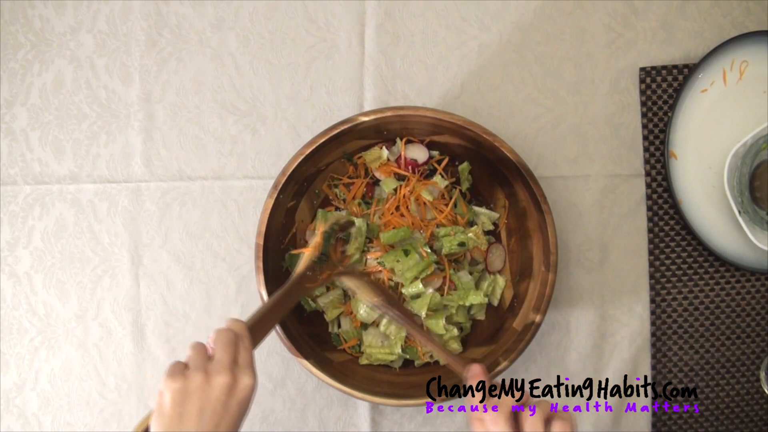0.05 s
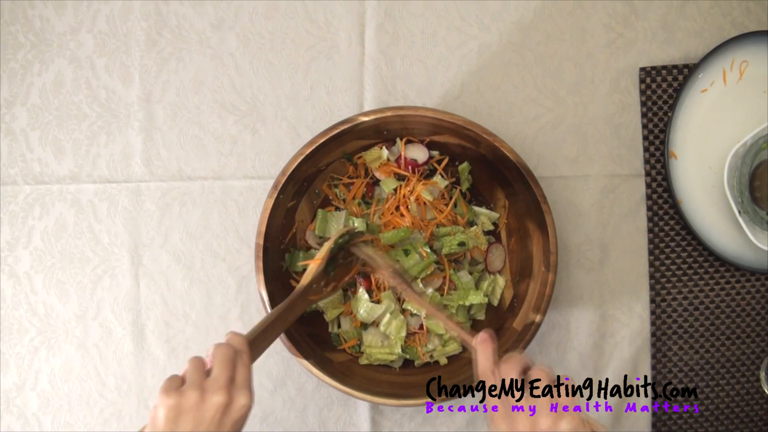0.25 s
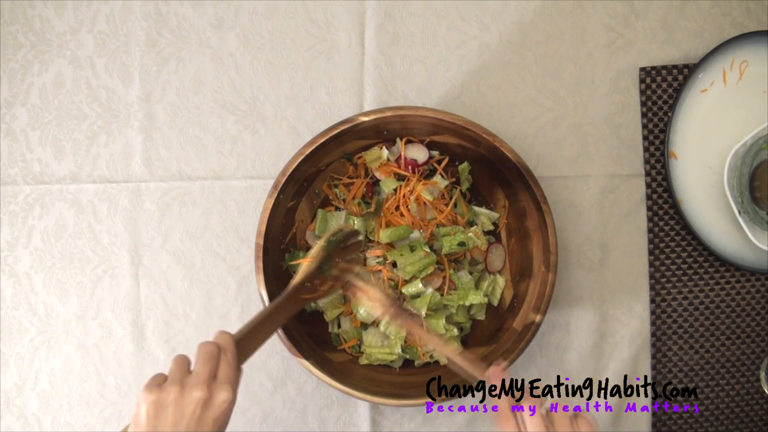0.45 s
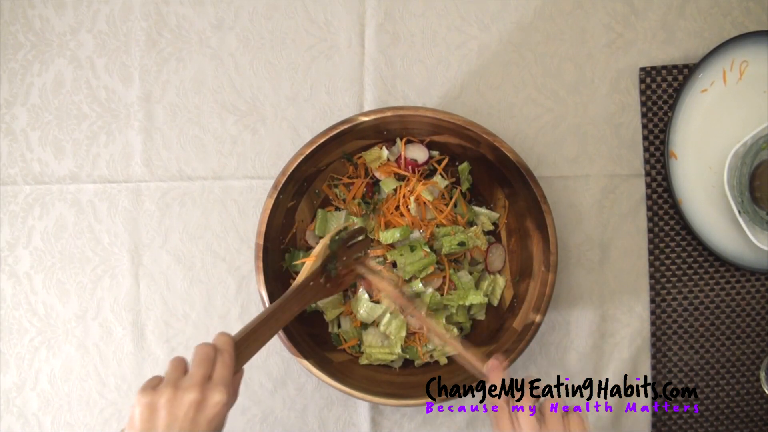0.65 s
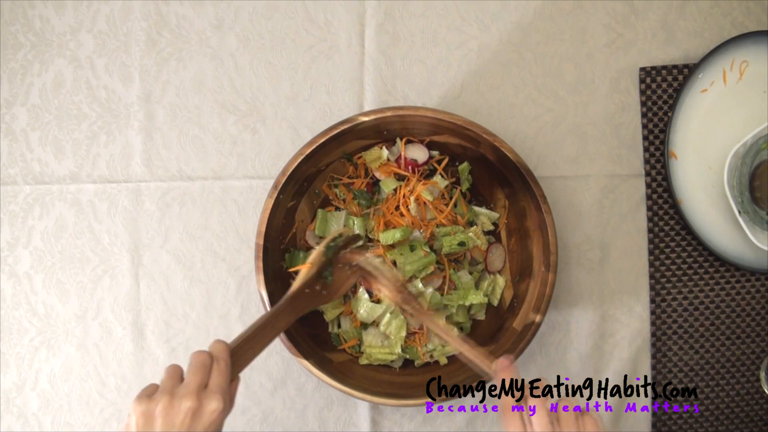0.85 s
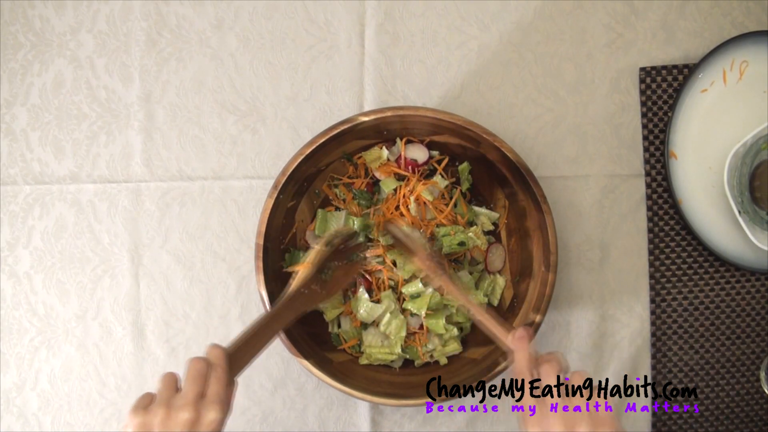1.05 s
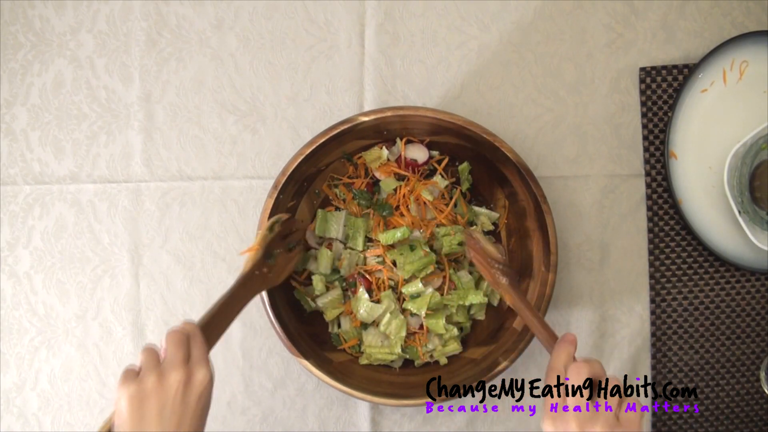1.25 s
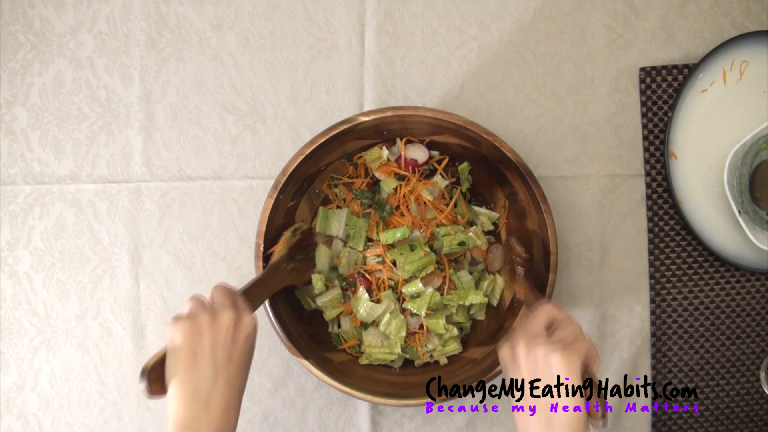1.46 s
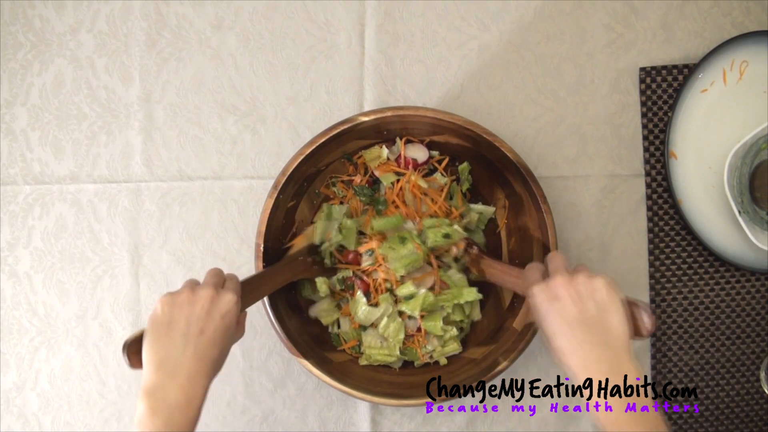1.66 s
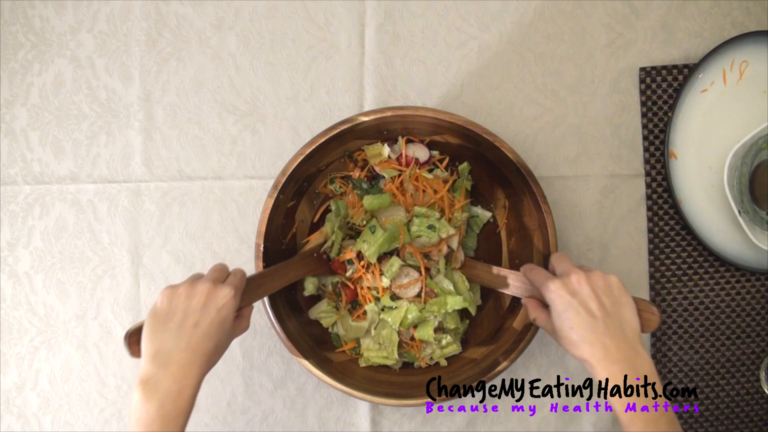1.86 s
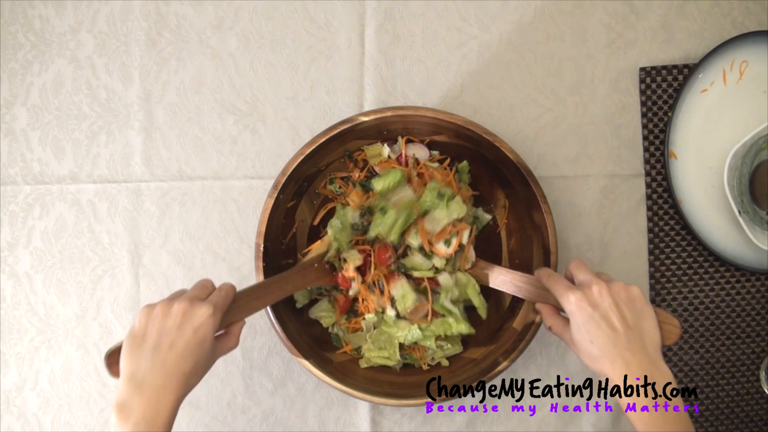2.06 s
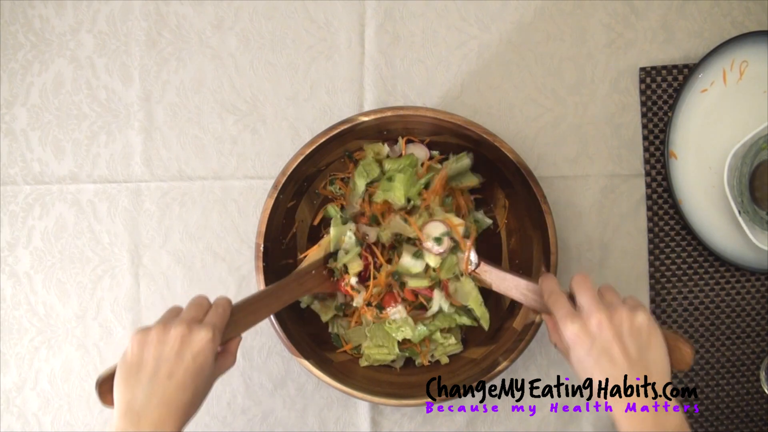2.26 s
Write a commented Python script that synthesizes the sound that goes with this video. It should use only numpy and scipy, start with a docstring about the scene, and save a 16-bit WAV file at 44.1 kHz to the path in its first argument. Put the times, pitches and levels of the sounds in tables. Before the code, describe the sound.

Wooden servers clack together and knock a wooden bowl as leafy salad is tossed.

```python
"""A sharp wooden clack comes first: two servers meet while tossing a leafy salad in a wooden bowl.
They clack again, then one knocks the bowl, which rings hollow, and scrapes down its wall.
The leaves crinkle and snap as they are lifted, and the bowl bumps softly on the table.
Each sound echoes briefly in a quiet kitchen, over a faint rumble and hiss."""
import sys
import numpy as np
from scipy import signal
from scipy.fft import rfft, irfft, next_fast_len
from scipy.io import wavfile
from scipy.ndimage import uniform_filter1d, minimum_filter1d, map_coordinates

SR = 44100
rng = np.random.default_rng(int(sys.argv[2]) if len(sys.argv) > 2 else 0)


def master(y):
    """Save y as 16-bit WAV."""
    cut = np.clip(np.atleast_2d(y).T, -1, 1)
    pcm = np.round(cut * 32767)  # scale
    wavfile.write(sys.argv[1], SR, pcm.astype(np.int16))


N = 101429


def amp(db):
    """Turn decibels into a number to multiply by."""
    return 10 ** (np.asarray(db) / 20)


def unit(x):
    """Scale a sound to an average (rms) strength of 1."""
    return x / np.sqrt(np.mean(x ** 2) + 1e-20)


def along(points, hz):
    """Read between (frequency, value) points on a log frequency scale."""
    freqs, values = np.transpose(points)
    return np.interp(np.log(hz + 1), np.log(freqs + 1), values)


def level(points):
    """A volume curve through (time [s], level [dB]) points."""
    return amp(np.interp(np.arange(N) / SR, *np.transpose(points)))


def filtered(x, response):
    """Turn each frequency up or down by response(hz)."""
    size = next_fast_len(N + SR // 2)
    return irfft(rfft(x, size) * response(np.fft.rfftfreq(size, 1 / SR)), size)[..., :N]


def coloured(x, colour):
    """Give a sound a tone colour (its mix of low and high), at strength 1."""
    return unit(filtered(x, lambda hz: amp(along(colour, hz))))


def delayed(x, s):
    """Start a sound s seconds later."""
    return np.pad(x, (max(round(s * SR), 0), 0))[:N]


def fade(fade_s):
    """Die away by 60 dB in fade_s seconds, the 'fade time'."""
    return np.exp(-np.log(1000) * np.arange(N) / SR / fade_s)


def pan(db):
    """Left and right volumes that average 1; positive dB leans left."""
    left = np.atleast_1d(amp(db))
    return 2 * np.array([left, np.ones_like(left)]) / (1 + left)


def widen(mid, side, side_db):
    """Make stereo: both ears share mid and get side with opposite signs."""
    return np.array([mid + amp(side_db) * side, mid - amp(side_db) * side])


def ring(tones, attack_s, pitch=1):
    """One blow sets all of an object's tones ringing; each fades at its own pace."""
    t = np.arange(N) / SR
    tone = sum(amp(db) * fade(fade_s) * np.sin(2 * np.pi * hz * pitch * t) for hz, db, fade_s in tones)
    return tone * (1 - np.exp(-(t / attack_s) ** 2))


def crack(colour, fade_s, attack_s):
    """The noise of a hit: one clean push and a burst of rough chatter."""
    size, push_db, chatter_db = 8192, -2.5, -0.5
    t = np.arange(size) / SR
    # build a colour filter that makes no sound before the hit (minimum phase)
    gains = unit(amp(along(colour, np.fft.rfftfreq(size, 1 / SR))))
    cepstrum = irfft(np.log(gains))
    cepstrum[1:size // 2] *= 2
    cepstrum[size // 2 + 1:] = 0
    chatter = rng.standard_normal(size) * fade(fade_s)[:size] * (1 - np.exp(-t / attack_s))
    push = np.linalg.norm(chatter) * (np.arange(size) == round(attack_s * SR))
    burst = amp(push_db) * push + amp(chatter_db) * chatter
    return np.pad(irfft(rfft(burst) * np.exp(rfft(cepstrum))), (0, N - size))


def grains(per_s, spread_db):
    """Tiny clicks of uneven size at random moments."""
    clicks = (rng.random(N) < per_s / SR) * np.sign(rng.standard_normal(N))
    return clicks * amp(spread_db * np.clip(rng.standard_normal(N), -2, 2))


# tone colour of the quiet room (frequency [Hz], level [dB])
ROOM_TONE_COLOUR = [(12, -29), (20, 5.5), (107, -3), (138, -4), (168, -4.5), (228, 0.5), (319, -1.5),
                    (399, -2.5), (923, 0), (1480, -2.5), (1910, -4), (2320, -7), (16000, -23)]
# which way it leans (frequency [Hz], left minus right [dB])
ROOM_TONE_BALANCE = [(60, -12), (110, -19), (200, -7.5), (380, 1), (1000, 2), (5000, 2.5), (9000, 0),
                     (15000, -23)]
def room_tone():
    """The room's steady, faint rumble and hiss."""
    mid = coloured(rng.standard_normal(N), ROOM_TONE_COLOUR)
    side = coloured(rng.standard_normal(N), ROOM_TONE_COLOUR)
    stereo = widen(mid, side, side_db=-2.5)
    return amp(-56) * filtered(stereo, lambda hz: pan(along(ROOM_TONE_BALANCE, hz)))


# how long the room's echo lasts (frequency [Hz], fade time [s])
ECHO_FADE = [(150, 0.44), (500, 0.61), (1400, 0.57), (2600, 0.53), (4500, 0.6), (9000, 0.6), (15000, 0.15)]
# tone colour of that echo (frequency [Hz], level [dB])
ECHO_COLOUR = [(100, 1.5), (500, 2.5), (1400, -0.5), (3000, -2), (6000, 1.5), (11000, 2), (16000, -2)]
def echo_tail():
    """Countless reflections blur into noise that swells quickly and dies away."""
    onset_s, build_s, smooth_hz = 0.0053, 0.0029, 120
    bands, times, spectra = signal.stft(rng.standard_normal((2, SR)), SR, nperseg=256)
    decay = np.exp(-np.log(1000) * times / along(ECHO_FADE, bands)[:, None])
    tail = signal.istft(spectra * decay, SR, nperseg=256)[1]
    size = tail.shape[1]
    tail *= 1 - np.exp(-np.maximum(np.arange(size) / SR - onset_s, 0) / build_s)
    # even out chance peaks, then add the room's colour
    spectrum, hz = rfft(tail), np.fft.rfftfreq(size, 1 / SR)
    power = np.abs(uniform_filter1d(np.abs(spectrum) ** 2, round(smooth_hz / hz[1])))
    tail = irfft(spectrum * amp(along(ECHO_COLOUR, hz)) / np.sqrt(power), size)
    return widen(*tail[:, :SR * 3 // 4], side_db=-0.5)


# bounces off the two nearest surfaces (delay [s], level [dB])
WALL_BOUNCES = [(.0047, -18.5), (0.0108, -14)]
def kitchen(x, echo_db):
    """A sound arrives directly, then off nearby surfaces and as a blurred stereo echo."""
    echo = signal.fftconvolve(x[None], echo_tail(), axes=1)[:, :N]
    bounces = sum(amp(db) * delayed(x, s) for s, db in WALL_BOUNCES)
    return x + pan(db=-1) * (amp(echo_db) * echo + bounces)


# the bowl meets the table (time [s], level [dB])
BUMP_HITS = [(2.191, -42), (2.254, -37.5), (2.28, -51)]
# low tones of each bump (frequency [Hz], level [dB], fade time [s])
BUMP_TONES = [(80, -20, 0.17), (193, -2, 0.052), (269, 6, 0.045), (464, 9, 0.02), (654, -11, 0.062)]
def bowl_bumps():
    """The bowl thuds softly on the table as the salad is lifted."""
    thud = ring(BUMP_TONES, attack_s=0.0017)
    return kitchen(sum(amp(db) * delayed(thud, s) for s, db in BUMP_HITS), echo_db=-4)


# loudness of the shifting leaves (time [s], level [dB])
RUSTLE_LEVEL = [(0, -70), (.72, -65), (.755, -50.5), (.78, -49.5), (.81, -70), (.95, -84), (1.22, -82),
                (1.28, -57), (1.36, -59.5), (1.5, -51), (1.67, -46.5), (1.85, -42.5), (1.95, -96),
                (2.11, -53), (2.22, -59.5), (2.3, -56)]
# tone colour of the rustle (frequency [Hz], level [dB])
RUSTLE_COLOUR = [(300, 0), (1500, 1), (2700, 1), (3700, 2.5), (5500, -3), (8000, -5.5), (11500, -4.5),
                 (14000, -17), (16000, -15.5)]
# crisp leaves snapping (time [s], level [dB], centre frequency [Hz], width [octaves])
LEAF_SNAPS = [(1.5465, -47, 8000, 0.46), (1.5642, -46, 10100, .4), (1.669, -38, 10500, 0.25),
              (1.676, -34.5, 9800, 0.28), (2.0715, -39, 4670, 0.77), (2.2, -43, 10400, 0.13),
              (2.2825, -42.5, 12000, 0.21), (2.288, -48, 11500, .25)]
def leaves():
    """Moving lettuce makes a fine crinkle of tiny clicks, with a few crisp snaps."""
    out = coloured(grains(per_s=2500, spread_db=5.5), RUSTLE_COLOUR) * level(RUSTLE_LEVEL)
    for s, db, centre_hz, octaves in LEAF_SNAPS:
        band = lambda hz: 1 / (1 + (np.log2((hz + 1) / centre_hz) / octaves) ** 2)
        snap = unit(filtered(rng.standard_normal(N), band)) * fade(fade_s=0.0093)
        out = out + amp(db) * delayed(snap, s)
    return pan(db=2.5) * kitchen(out, echo_db=-7)


# loudness of the server sliding down the bowl (time [s], level [dB])
SCRAPE_LEVEL = [(1.6, -62), (1.69, -44), (1.7, -35), (1.745, -35), (1.795, -38.5), (1.825, -36),
                (1.862, -34), (1.895, -45), (1.925, -65), (1.97, -62)]
# tones of server and bowl pressed together (frequency [Hz], width [Hz], level [dB])
SCRAPE_TONES = [(282, 43, 0), (562, 143, 1.5), (1423, 123, 4.5), (1930, 79, 7), (2785, 390, 1.5),
                (3640, 140, 0.5), (3904, 170, -0.5), (5830, 490, -34), (7700, 2400, -17),
                (12300, 2100, -10)]
def server_scrape():
    """Wood catches and slips on wood; the many tiny jolts make server and bowl rasp."""
    judder_per_s, judder_db, top_hz = 120, 1.2, 11570
    judder = map_coordinates(rng.standard_normal(2048), [np.arange(N) * judder_per_s / SR])
    slips = grains(per_s=3000, spread_db=2.5) * amp(judder_db * judder)
    wood = lambda hz: sum(amp(db) * 1j * hz * width / (centre ** 2 - hz ** 2 + 1j * hz * width)
                          for centre, width, db in SCRAPE_TONES)
    rasp = filtered(slips, lambda hz: wood(hz) / (1 + (hz / top_hz) ** 10))
    started = np.arange(N) > SCRAPE_LEVEL[0][0] * SR
    return kitchen(unit(rasp) * level(SCRAPE_LEVEL) * started, echo_db=-9)


# a server hits the bowl (time [s], level [dB], crack within the hit [dB])
KNOCK_HITS = [(1.376, -17, 6.5), (1.3838, -15.5, 0.5), (1.4859, -37.5, 11.5)]
# tones the bowl rings with (frequency [Hz], level [dB], fade time [s])
BOWL_TONES = [(203.3, -27.5, 0.33), (275, -36.5, 0.56), (295.2, -23.5, 0.2), (317, -22, 0.42),
              (539.5, -30.5, 0.28), (730.7, -12, .3), (756, -14.5, 0.34), (877, -6.5, 0.054),
              (1321, -14, 0.087), (1407.6, 0, 0.094), (1449, -7, 0.087), (1980, -24, 0.26),
              (2083, -3, 0.099), (2440, -14, 0.018), (3027, 4, 0.022)]
# tone colour of the knock's crack (frequency [Hz], level [dB])
KNOCK_COLOUR = [(50, -18.5), (130, -17), (280, -3), (1000, -2.5), (2800, 3.5), (4500, -8), (7000, -17),
                (9500, -29.5), (11500, -30), (16000, -59.5)]
def bowl_knocks():
    """A server hits the bowl and bounces; the bowl rings hollow."""
    attack_s, crack_fade_s = 0.0008, 0.029
    out = 0
    for s, db, crack_db in KNOCK_HITS:
        blow = ring(BOWL_TONES, attack_s) + amp(crack_db) * crack(KNOCK_COLOUR, crack_fade_s, attack_s)
        out = out + kitchen(amp(db) * delayed(blow, s), echo_db=-1)
    return out


# server hits server; the last three columns set the mix within the hit
# (time [s], level [dB], attack [s], pitch [ratio], crack [dB], edge snap [dB], hollow body [dB])
CLACK_HITS = [(.218, 3, 0.0012, 0.98, -8.5, -31.5, -28), (0.6144, -32, 0.00081, 1.0, -10, -7, -14),
              (1.0181, -2.5, 0.00036, 1.0, -10.5, -28.5, -25), (1.0198, -9.5, 0.00028, 1.0, -6, -27, -44)]
# tones the servers ring with (frequency [Hz], level [dB], fade time [s])
SERVER_TONES = [(485, -27, 0.027), (697, -26, 0.038), (1012, -18.5, 0.029), (1300, -10, 0.016),
                (2498, -5, 0.014), (2548, -4, 0.023), (2765, -13.5, 0.02), (3080, -12, 0.0076),
                (3704, -16.5, 0.023), (4040, -19.5, 0.021)]
# tone colours of the crack, the edge snap and the hollow body (frequency [Hz], level [dB])
CLACK_COLOUR = [(100, -39.5), (300, -21), (600, 2.5), (1500, 11.5), (3000, 15), (4200, 7.5), (7000, -9.5),
                (9500, -22.5), (16000, -29)]
EDGE_COLOUR = [(300, -4), (3000, -38), (5000, 1), (7400, 5), (9500, -9), (11500, 1.5), (13500, -18),
               (16000, -39)]
HOLLOW_COLOUR = [(60, -19), (160, -22), (270, -13), (420, -3), (560, -19.5), (720, 3.5), (1000, -4),
                 (3000, -39.5), (16000, -83)]
def server_clacks():
    """The servers meet: a very short ring, a dry crack, a bright edge snap and a little hollow body."""
    crack_fade_s, edge_fade_s, hollow_fade_s = 0.018, 0.032, 0.018
    out = 0
    for s, db, attack_s, pitch, crack_db, edge_db, hollow_db in CLACK_HITS:
        blow = ring(SERVER_TONES, attack_s, pitch)
        blow += amp(crack_db) * crack(CLACK_COLOUR, crack_fade_s, attack_s)
        blow += amp(edge_db) * crack(EDGE_COLOUR, edge_fade_s, attack_s)
        blow += amp(hollow_db) * crack(HOLLOW_COLOUR, hollow_fade_s, attack_s)
        out = out + kitchen(amp(db) * delayed(blow, s), echo_db=-4.5)
    return out


# which way the salad sounds lean (frequency [Hz], left minus right [dB])
SALAD_BALANCE = [(30, -14), (150, -18), (500, -11.5), (1200, -10), (2500, -6.5), (5000, -8.5), (8500, -1.5),
                 (15000, -7.5)]
def scene():
    """The salad is louder on the right, with the quiet room all around."""
    salad = server_clacks() + bowl_knocks() + server_scrape() + leaves() + bowl_bumps()
    return filtered(salad, lambda hz: pan(along(SALAD_BALANCE, hz))) + room_tone()


# how the highest treble falls away (frequency [Hz], level [dB])
TREBLE_SHAPE = [(11500, 0), (13000, 0.5), (14500, 0.5), (16000, -9)]
def record(dry):
    """Turn the volume down for an instant at any too-loud peak, then cut the highest treble."""
    ceiling, window_s, top_hz = 0.96, 0.003, 16000
    size = round(window_s * SR)
    needed = ceiling / np.maximum(np.abs(dry).max(axis=0), ceiling)
    gain = uniform_filter1d(minimum_filter1d(needed, size), size)
    return filtered(dry * gain, lambda hz: amp(along(TREBLE_SHAPE, hz)) * (hz < top_hz))


dry = scene()
out = record(dry)
master(out)
```